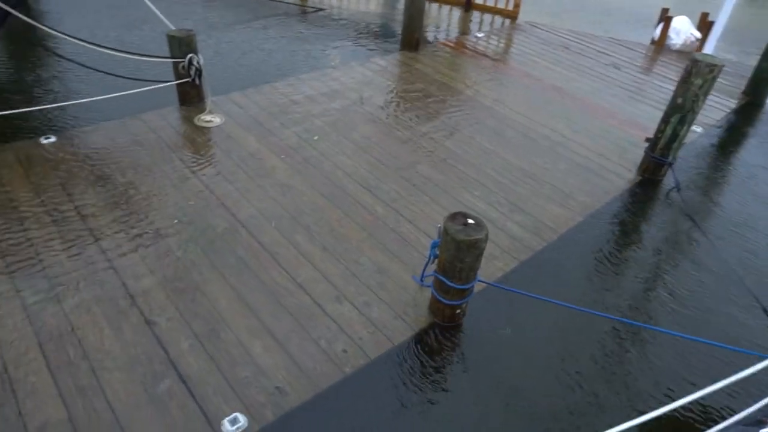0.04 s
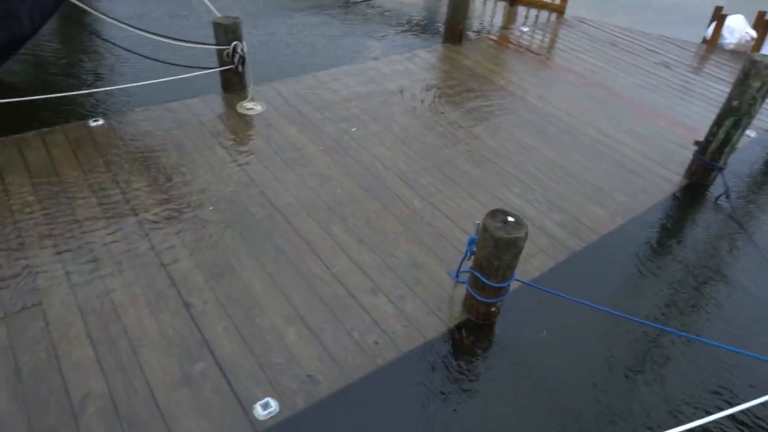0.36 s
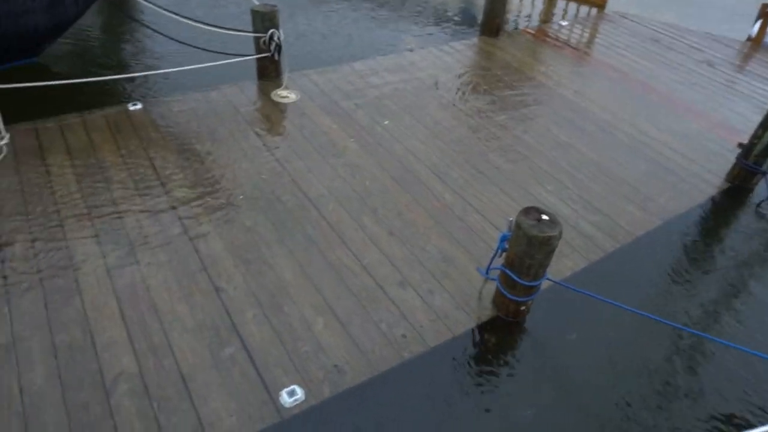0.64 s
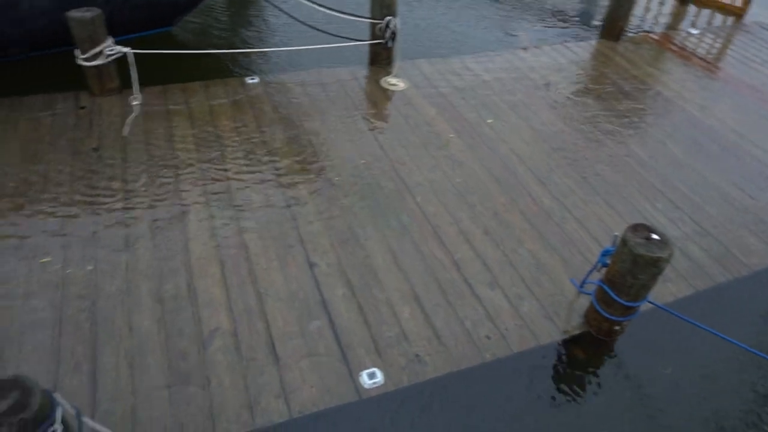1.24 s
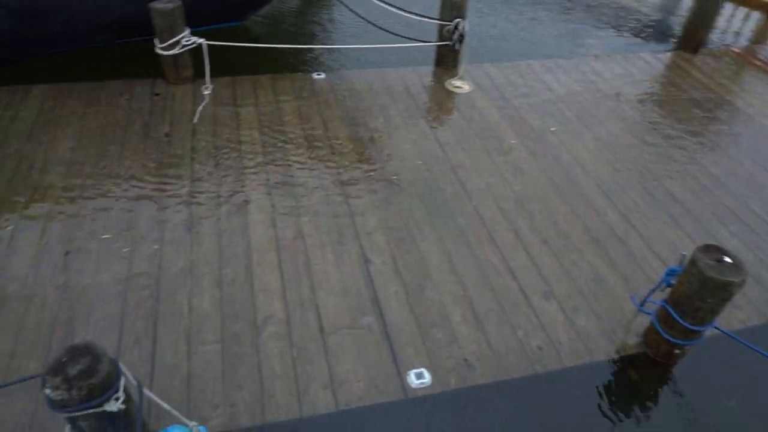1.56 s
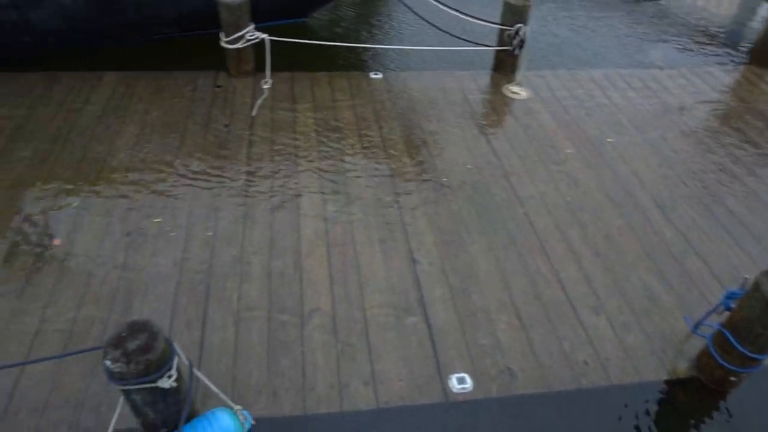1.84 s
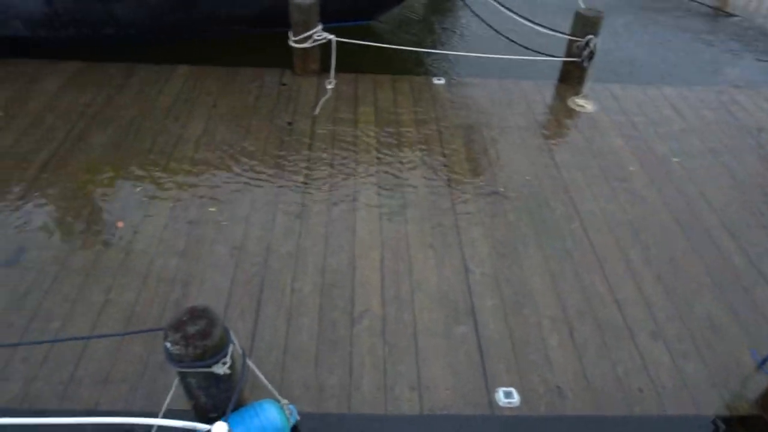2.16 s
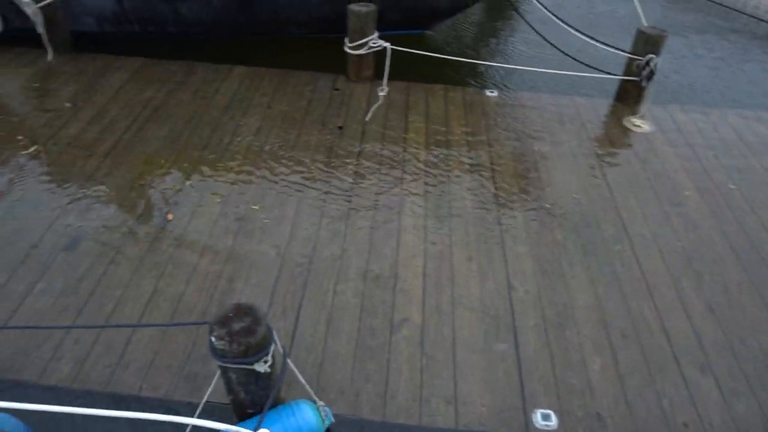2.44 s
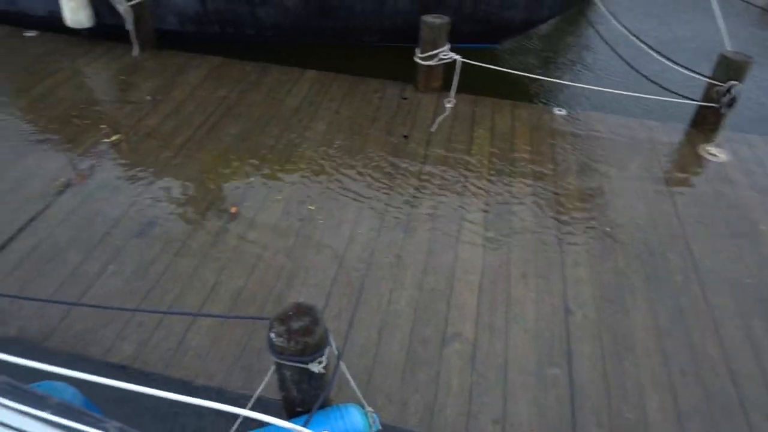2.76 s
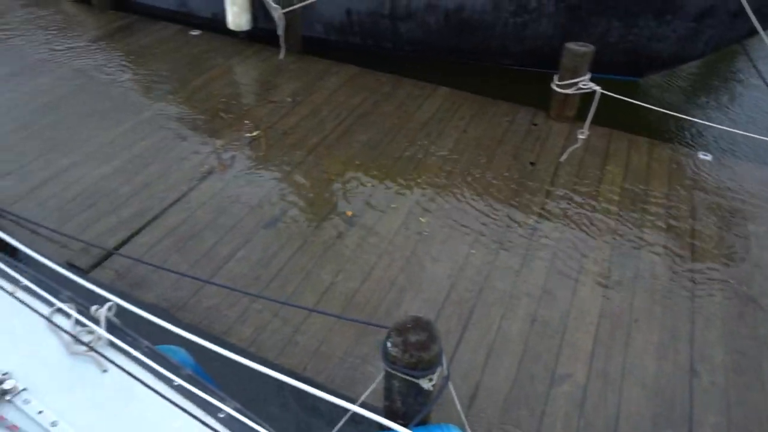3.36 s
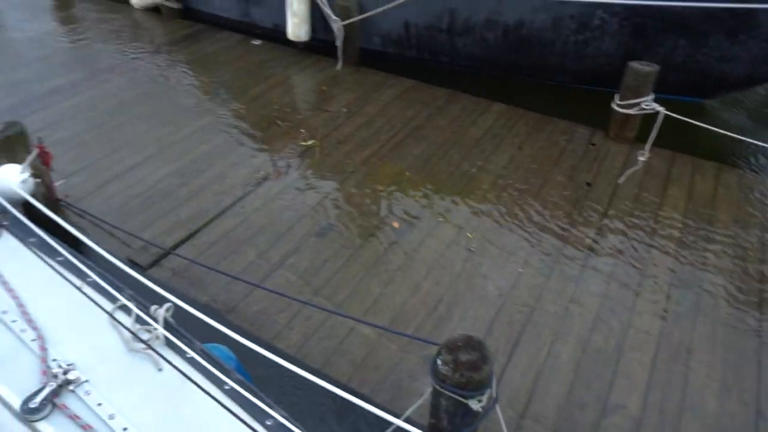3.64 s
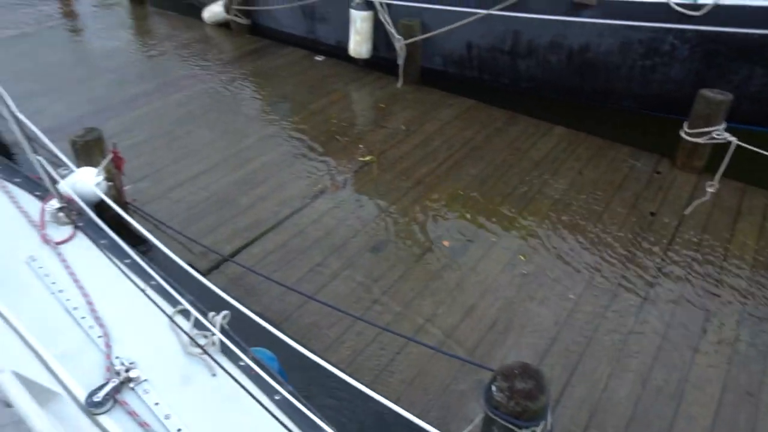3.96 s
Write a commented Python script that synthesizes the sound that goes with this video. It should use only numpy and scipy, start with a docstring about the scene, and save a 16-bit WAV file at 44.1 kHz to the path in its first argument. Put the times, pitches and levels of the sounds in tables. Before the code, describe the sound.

Deep wind rumbles on the microphone from the start, with hard, distorting buffets in the first half second and near 1 second. Faint ripples wash underneath. Gear starts clacking against a moored boat around 1.3 seconds, with light halyard pings on masts. The biggest gust hits from 1.8 to 2.5 seconds, with a few dry ticks. As it eases, the loudest clacks come near 2.8 and 3.7 seconds.

```python
"""Moored boats work at their lines beside a flooded wooden dock, ripples hissing over the planks.
Wind rumbles on the microphone from the start; its hardest buffets pin the capsule and choke all else.
After a second, gear begins to clack against a boat in quick clusters, and halyards ping on the masts.
The biggest gust comes around two seconds, with a run of buffets and a few small dry ticks.
As it eases, the loudest clacks stand out over the water."""
import sys
import numpy as np
from scipy import signal
from scipy.fft import rfft, irfft
from scipy.io import wavfile
from scipy.ndimage import uniform_filter1d

SR = 44100
rng = np.random.default_rng(int(sys.argv[2]) if len(sys.argv) > 2 else 0)


def pcm_store(signal):
    """Save signal as 16-bit PCM."""
    levels = np.round(np.clip(np.atleast_2d(signal), -1, 1) * 32767)
    wavfile.write(sys.argv[1], SR, levels.astype(np.int16).T)


N = 176400

# rides for the ripple wash, breeze hiss, deep wind rumble and flutter above it (time [s], level [dB])
WASH_RIDE = [(0, -43), (.3, -48), (.5, -48.5), (.68, -49), (1.15, -51), (1.65, -51.5), (2.2, -49.5),
             (2.7, -45.5), (3.1, -48.5), (3.55, -45.5), (4, -47.5)]
HISS_RIDE = [(0, -68.5), (.45, -70), (.66, -65), (.85, -75), (1.6, -79), (2.4, -74), (3.1, -70.5),
             (3.6, -68.5), (4, -66)]
RUMBLE_RIDE = [(0, -14), (.3, -14), (.47, -21), (.56, -38), (.65, -11.5), (.75, -31), (1.0, -11.5),
               (1.14, -21.5), (1.22, -25), (1.36, -34), (1.45, -17), (1.75, -11.5), (2.05, -8.5),
               (2.5, -15), (2.85, -22.5), (3.02, -21), (3.35, -28.5), (3.57, -16), (3.8, -32), (4, -45.5)]
FLUTTER_RIDE = [(0, -35), (.2, -34.5), (.52, -45.5), (.65, -41.5), (1.0, -35.5), (1.38, -41.5),
                (1.62, -37.5), (1.8, -29.5), (2.0, -29), (2.58, -34), (2.8, -37.5), (3.5, -32.5),
                (4, -36.5)]
# EQ curves of the noise layers; sway is the slowest eddies (frequency [Hz], relative level [dB])
WASH_EQ = [(200, 14), (700, 5), (1200, 2.5), (1900, -2.5), (2500, -5), (3300, -8.5), (6000, -11),
           (9000, -20), (10500, -23.5), (15800, -33.5)]
HISS_EQ = [(3000, -21.5), (6000, -0.5), (9000, 3), (10500, -4.5), (15800, -11.5)]
SWAY_EQ = [(4, -4), (9, 5), (14, 5), (19, -4.5), (40, -76.5)]
RUMBLE_EQ = [(10, -25), (20, -1), (32, -1), (52, -7), (75, -18), (110, -33), (200, -58)]
FLUTTER_EQ = [(35, -2), (70, -0.5), (120, -3.5), (200, -9.5), (300, -15), (450, -27.5), (800, -35.5),
              (2500, -62)]
CLACK_EQ = [(200, -9), (650, -4.5), (950, 4.5), (1250, 7.5), (1450, 4), (1900, 3.5), (2400, 2.5),
            (3200, 1.5), (4500, -1.5), (6500, -10.5), (9000, -22.5), (11000, -35.5), (15000, -48)]
# small dry ticks (time [s], level [dB], centre [Hz])
TICK_CUES = [(0.22, -46.5, 2830), (.334, -46.5, 1580), (1.027, -41.5, 1130), (1.461, -48, 3120),
             (2.074, -46, 1710), (2.119, -44.5, 1440), (2.148, -42, 1320), (2.258, -43, 1110)]
# soft puffs of wind (time [s], level [dB])
PUFF_CUES = [(1.986, -26.5), (2.53, -23.5), (2.579, -20), (3.006, -20)]
# buffets that pin the capsule (middle [s], length [s], direction [1 push, -1 pull], release thump [dB])
BUFFET_CUES = [(.012, 0.014, 1, -11), (0.107, 0.028, 1, -10), (0.36, 0.027, 1, -18.5),
               (0.405, 0.014, 1, -10), (.438, .012, -1, -16.5), (0.968, 0.0062, -1, -6),
               (1.037, 0.0067, -1, -16), (1.795, 0.013, -1, -4.5), (1.817, 0.013, 1, -11),
               (1.879, 0.0042, -1, -3.5), (1.999, 0.0072, -1, -4.5), (2.099, 0.017, -1, -8),
               (2.174, 0.022, -1, -6.5), (2.232, 0.027, -1, -8.5), (2.523, 0.023, -1, -10)]
# halyards striking masts (time [s], level [dB], pitch [Hz], ring t60 [s], overtone trim [dB])
PING_CUES = [(0.222, -52, 1293, 0.61, -12), (1.207, -53.5, 1296, 0.22, 0.5),
             (1.303, -53.5, 1108, 0.37, -3.5), (1.458, -52, 1292, 0.25, -13), (1.861, -40, 1105, 0.22, -6),
             (2.322, -53, 1677, 0.4, -11), (2.629, -45.5, 1695, 0.23, -6), (2.793, -41.5, 1106, .36, -14),
             (3.669, -40.5, 1112, 0.3, -13), (3.932, -51, 1296, 0.34, -5)]
# mast modes, the lowest two a beating pair (frequency [x pitch], level [dB], decay [x ring t60])
MAST_MODES = [(1, 0, 1.5), (1.013, -4, 1.6), (1.809, -1.5, 0.57), (1.85, 2.5, 0.93), (2.95, -16, 0.21)]
# gear hitting the boat (time [s], relative level [dB], tilt [dB/octave], crack over clatter [dB])
CLACK_CUES = [(0.124, -49, 1, -7), (1.269, -42.5, 2.5, 9), (1.302, -46.5, 1, 6), (1.712, -38.5, 2, -6),
              (1.833, -32.5, -2, 4), (1.841, -33, 1, 9), (1.857, -37, 0.5, 20), (1.868, -48, -1, 21),
              (2.026, -38.5, 0, 0), (2.303, -35.5, 3, -1), (2.602, -29.5, 3.5, 6.5), (2.766, -52.5, 9, 24),
              (2.776, -27.5, 1.5, 9), (2.784, -27.5, 4.5, -6), (2.792, -33, -1, 11), (2.863, -34.5, 2.5, 3),
              (2.873, -36, -1.5, -2), (3.144, -36.5, 4.5, 13.5), (3.152, -32.5, -4, -3),
              (3.663, -30.5, 5, 10.5), (3.668, -26.5, 1.5, 9), (3.916, -38.5, -0.5, 9), (3.986, -54, 2, 6)]
# gear modes, shared by all hits (frequency [Hz], level [dB], t60 [s])
GEAR_MODES = [(hz, -13, .15) for hz in (977, 1397, 1594, 2853, 3030, 3190, 3380, 3940, 4676)]

CAPSULE_LIMIT = 0.77  # share of full scale


def undb(db):
    """Decibels to gain."""
    return 10 ** (np.asarray(db) / 20)


def ride(points):
    """A fader ride: gain over time through (time [s], level [dB]) points."""
    return undb(np.interp(np.arange(N) / SR, *np.array(points).T))


def noise(eq, tilt_db=0, size=N):
    """Noise of rms 1 through an EQ curve, tilted per octave; nothing above the last point."""
    octave = np.log2(np.maximum(np.fft.rfftfreq(size, 1 / SR), 1))
    hz, db = np.array(eq).T
    gain = undb(np.interp(octave, np.log2(hz), db, right=-np.inf) + tilt_db * octave)
    y = irfft(rfft(rng.standard_normal(size)) * gain, size)
    return y / y.std()


def drift(rate_hz):
    """A smooth random wobble with a spread near 1."""
    hold = int(SR / rate_hz)
    steps = np.repeat(rng.standard_normal(N // hold + 1), hold)
    return uniform_filter1d(steps, hold)[:N]


def fade(t, t60, rise_s=0.00015):
    """A quick attack, then a tail that falls 60 dB in t60 seconds."""
    return (1 - np.exp(-t / rise_s)) ** 2 * np.exp(-np.log(1000) * t / t60)


def ring(modes, t):
    """Decaying modes, balanced a little differently on each hit."""
    out = np.zeros(len(t))
    for hz, db, t60 in modes:
        gain = undb(db + 0.66 * rng.standard_normal())
        out += gain * fade(t, t60) * np.sin(2 * np.pi * (hz * t + rng.random()))
    return out


def add(out, start, sound):
    """Mix a sound in at its cue."""
    i = max(int(start * SR), 0)
    out[i:i + len(sound)] += sound[:max(N - i, 0)]


def saturate(x, limit, hardness):
    """Clean up to a flat ceiling with a rounded knee."""
    return x / (1 + np.abs(x / limit) ** hardness) ** (1 / hardness)


def ripples_and_breeze():
    """The bed: a soft wash of ripples and the fine hiss of the breeze, wavering together."""
    wash = noise(WASH_EQ) * ride(WASH_RIDE)
    hiss = noise(HISS_EQ) * ride(HISS_RIDE)
    return (wash + hiss) * undb(1.1 * drift(rate_hz=2.6))


def ticks():
    """Tiny dry ticks, each a burst of noise around its own pitch."""
    out, t = np.zeros(N), np.arange(2 ** 12) / SR
    for start, db, hz in TICK_CUES:
        eq = [(hz / 4, -55), (hz / 2, -13.75), (hz, 0), (hz * 2, -27.5), (hz * 4, -55)]
        add(out, start, undb(db) * noise(eq, size=len(t)) * fade(t, t60=0.043, rise_s=0.00043))
    return out


def wind_puffs():
    """Short eddies that bump the microphone, softer than the buffets."""
    out, t = np.zeros(N), np.arange(2 ** 14) / SR
    for start, db in PUFF_CUES:
        add(out, start, undb(db) * noise(FLUTTER_EQ, size=len(t)) * fade(t, t60=0.17, rise_s=0.0054))
    return out


def wind_eddies():
    """Eddies on the microphone: a sway more felt than heard, a deep rumble and a flutter on top."""
    sway = noise(SWAY_EQ) * undb(-10.5)
    rumble = noise(RUMBLE_EQ) * ride(RUMBLE_RIDE) * undb(1.5)
    flutter = noise(FLUTTER_EQ) * ride(FLUTTER_RIDE) * undb(1 + 1.94 * drift(rate_hz=25.29))
    return saturate(sway + rumble, 0.8 * CAPSULE_LIMIT, hardness=6) + flutter


def wind_buffets(air):
    """Each buffet holds the pressure just past the capsule's limit, then lets go, thumps and churns."""
    t = np.arange(N) / SR
    attack_s, release_s, thump_s = 0.012, 0.022, 0.0046
    held_pressure = 1.078 * CAPSULE_LIMIT
    churn = undb(-20) * noise(FLUTTER_EQ, tilt_db=3.5)
    for middle, length, direction, thump_db in BUFFET_CUES:
        before = np.maximum(middle - length / 2 - t, 0)
        after = np.maximum(t - middle - length / 2, 0)
        grip = np.cos(np.pi / 2 * np.minimum(before / attack_s + after / release_s, 1)) ** 2
        thump = after / thump_s * np.exp(1 - after / thump_s)
        rebound = undb(thump_db) * (thump + churn * fade(after, t60=0.066))
        air = air + grip * (direction * held_pressure - air) - direction * rebound
    return air


def halyard_pings():
    """A halyard's light tick sets a mast ringing at its own pitch, some hits brighter than others."""
    out, t = np.zeros(N), np.arange(2 ** 15) / SR
    for start, db, pitch_hz, t60, overtone_db in PING_CUES:
        modes = [(pitch_hz * ratio, level + overtone_db * (round(ratio) > 1), t60 * decay)
                 for ratio, level, decay in MAST_MODES]
        tick = undb(-2) * noise(CLACK_EQ, size=len(t)) * fade(t, t60=0.05)
        add(out, start, undb(db) * (ring(modes, t) + tick))
    return out


def gear_clacks():
    """Gear hits the boat: a sharp crack, a short ring and a dense clatter whose treble dies first."""
    out, t = np.zeros(N), np.arange(2 ** 15) / SR
    pivot_hz, pivot_t60, treble_damping, trim_db = 2000, 0.2, 0.13, -4.5
    octave = np.log2(np.maximum(np.fft.rfftfreq(len(t), 1 / SR), 1) / pivot_hz)
    bands = np.arange(-2, 3)  # octaves from the pivot
    for start, db, tilt_db, crack_db in CLACK_CUES:
        spectrum = rfft(noise(CLACK_EQ, tilt_db, size=len(t)))
        clatter = np.zeros(len(t))
        for k in bands:
            band = irfft(spectrum * np.interp(octave, bands, bands == k))
            band_t60 = pivot_t60 / 2 ** (k * treble_damping)
            clatter += band * fade(t, band_t60, rise_s=0.00093)  # blooms just behind the crack
        crack = undb(crack_db) * noise(CLACK_EQ, tilt_db, size=len(t)) * fade(t, t60=0.011)
        modes = [(hz, level + tilt_db / 2 * np.log2(hz / pivot_hz), t60)
                 for hz, level, t60 in GEAR_MODES]
        add(out, start, undb(db + trim_db) * (clatter + ring(modes, t) + crack))
    return out


def scene():
    """The mono mix of everything that reaches the microphone."""
    wind = wind_buffets(wind_eddies()) + wind_puffs()
    boats = gear_clacks() + halyard_pings()
    return (wind + boats + ticks() + ripples_and_breeze())[None]


def record(dry):
    """The capsule saturates, a low cut lets pinned stretches sag, peaks are capped and the top is cut."""
    low_cut = signal.butter(2, 12.8, "high", fs=SR, output="sos")
    high_cut = signal.ellip(8, 0.2, 70, 15800, fs=SR, output="sos")
    pinned = saturate(dry, CAPSULE_LIMIT, hardness=40)
    sagging = signal.sosfilt(low_cut, pinned - pinned[:, :1])  # start from zero, without a click
    return signal.sosfilt(high_cut, saturate(sagging, limit=0.71, hardness=12))


dry = scene()
out = record(dry)
pcm_store(out)
```